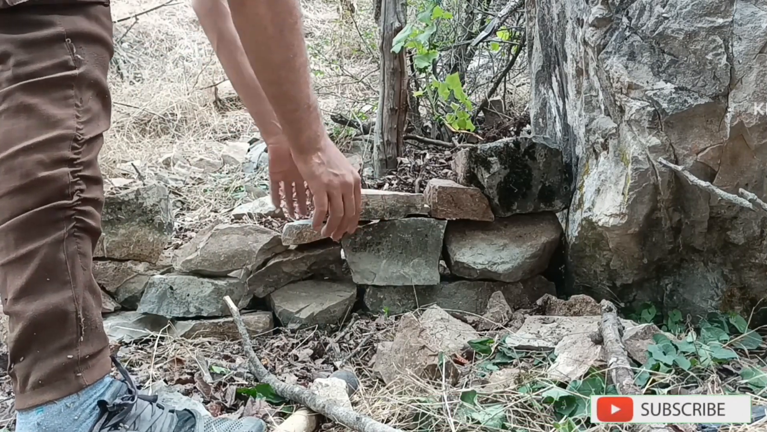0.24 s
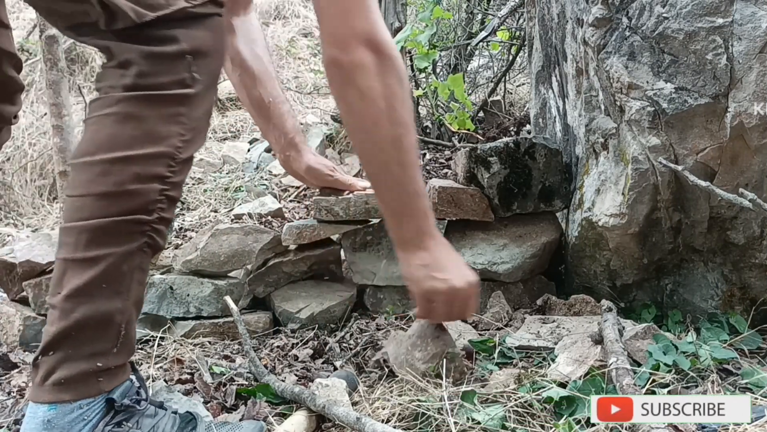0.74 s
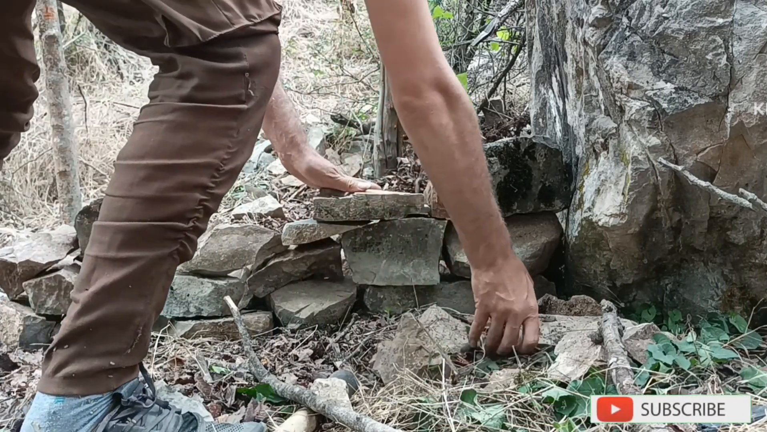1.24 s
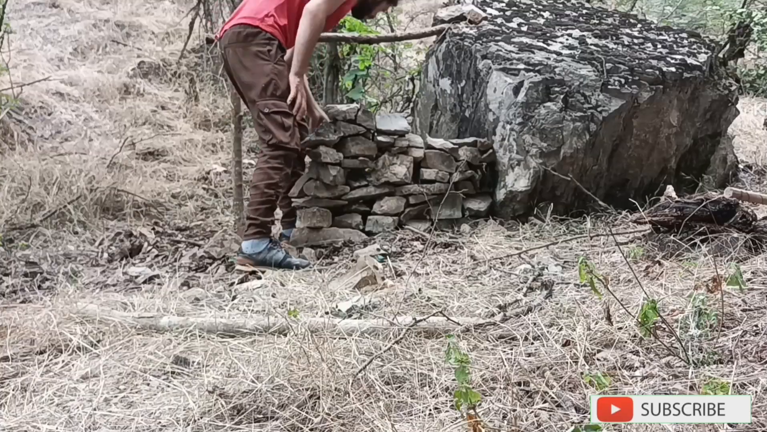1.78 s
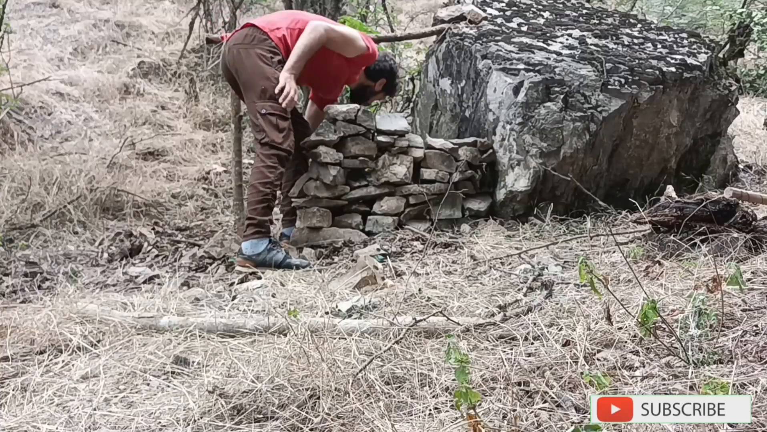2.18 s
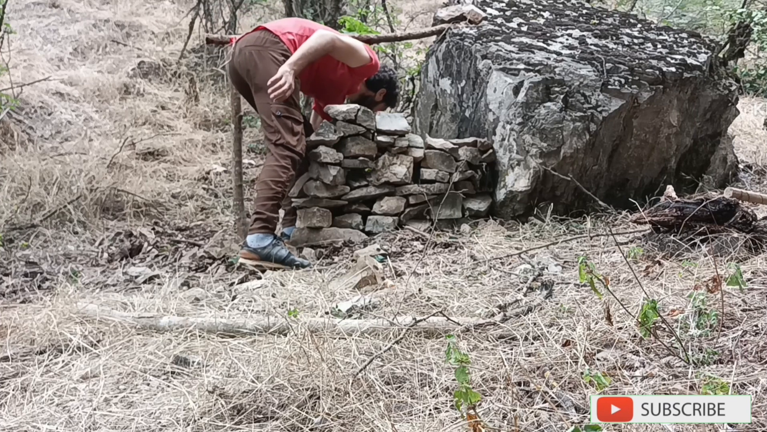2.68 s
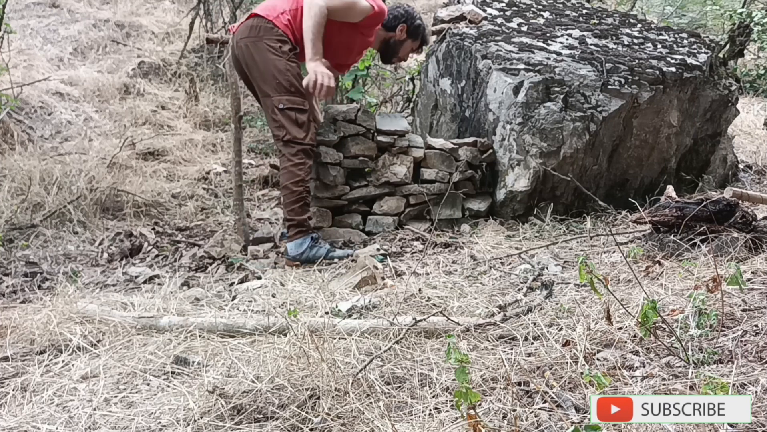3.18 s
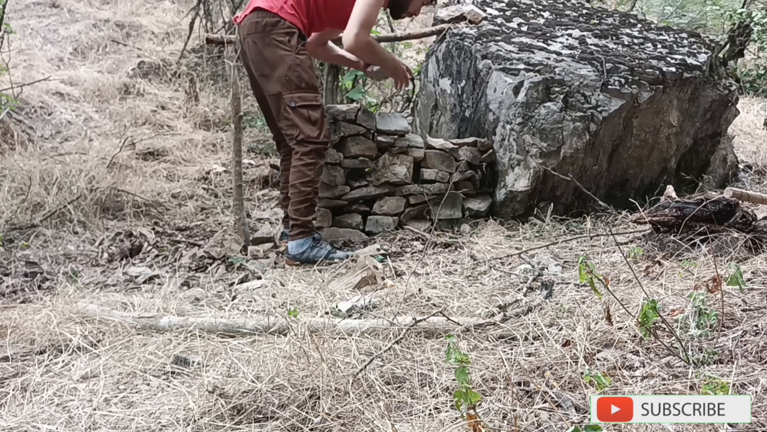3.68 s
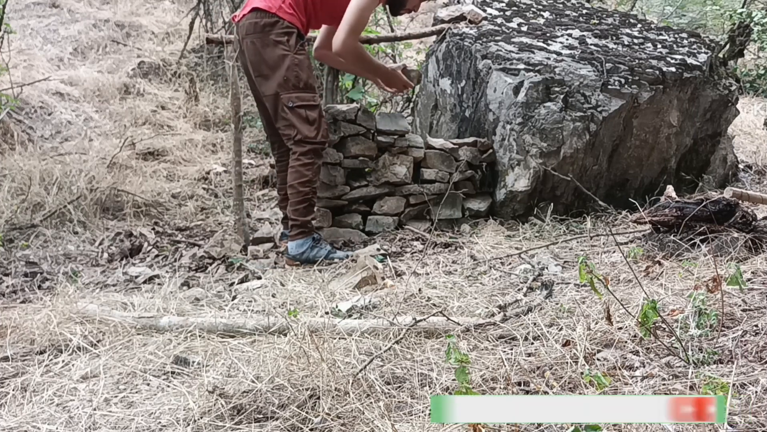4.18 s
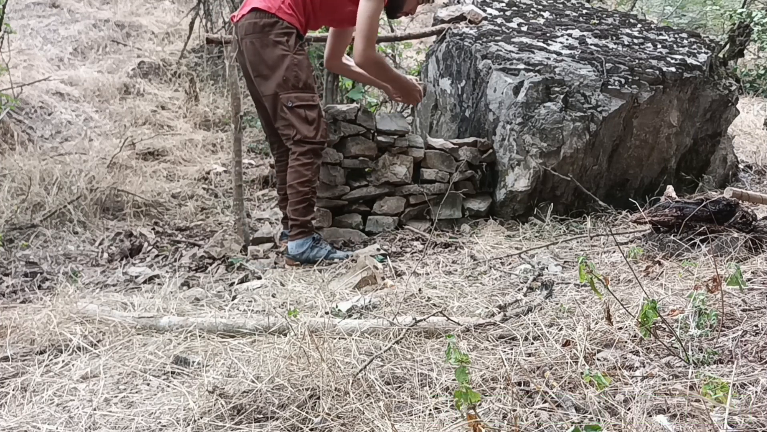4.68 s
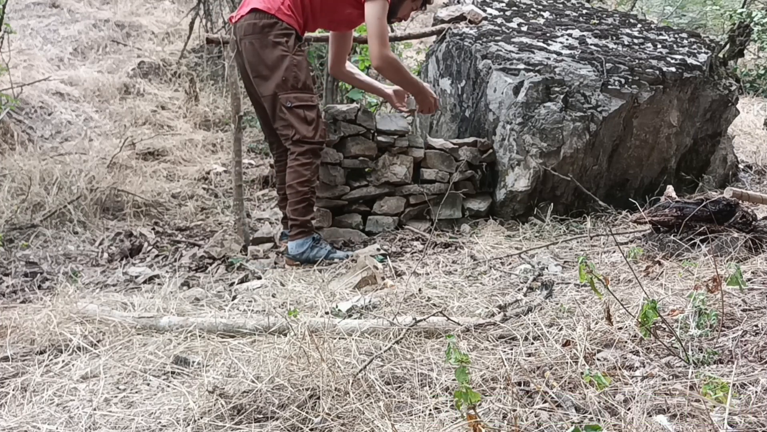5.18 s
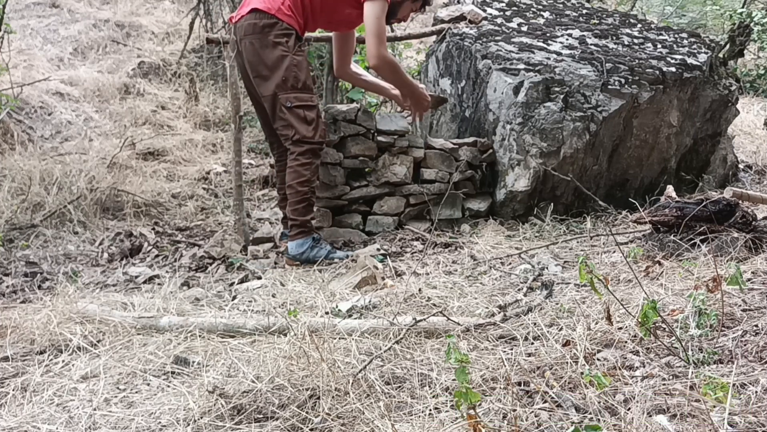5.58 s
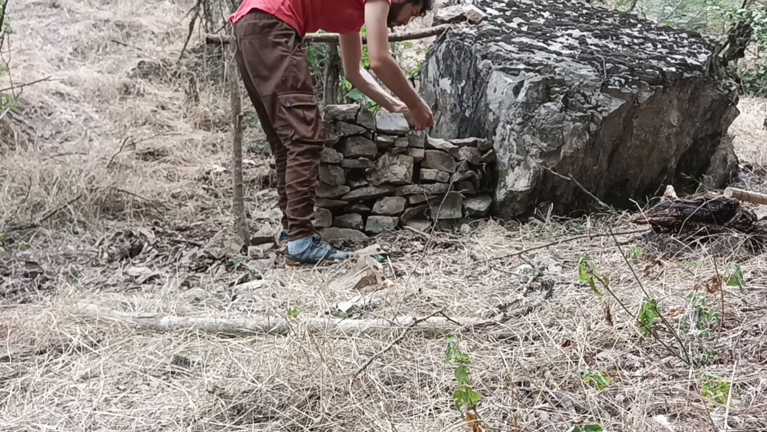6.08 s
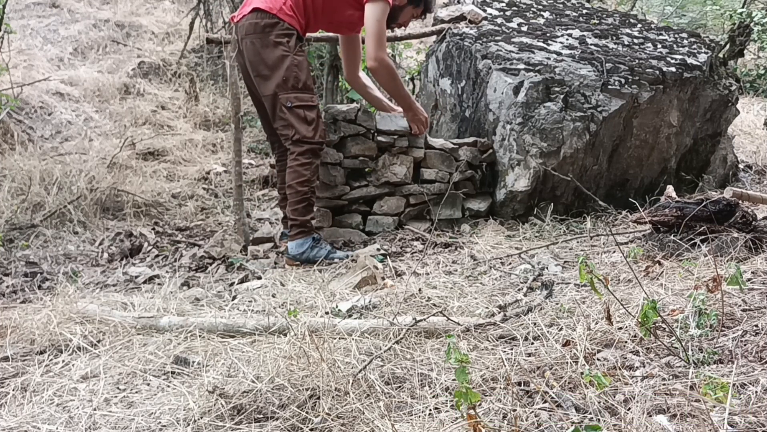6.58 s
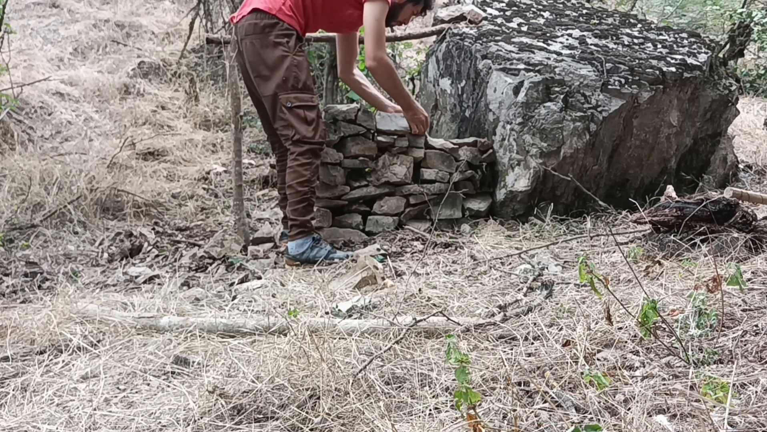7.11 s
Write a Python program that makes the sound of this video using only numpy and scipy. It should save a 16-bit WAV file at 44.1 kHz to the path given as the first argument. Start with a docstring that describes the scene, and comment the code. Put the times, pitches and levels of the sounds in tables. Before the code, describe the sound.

A faint, low outdoor rumble runs throughout. From 0 to 1.4 s, dry leaves and clothing rustle close by: a weak stone nudge near 0.4 s, small knocks with soft dull thuds at 0.64 and 0.91 s, then brushing and crisp twig snaps, strongest around 1.15 s. The close rustle stops dead at about 1.4 s. At 1.57 s a bright, hard stone clack strikes slightly left, with a low wall thud and quick shrinking rebounds. Light rustling continues. A softer, grittier blow falls at 2.7 s, followed by a run of little taps and soft thuds from 2.8 to 3.3 s. Quiet until a small twig tick at 4.3 s, then the loudest, sharpest clack at 4.53 s, with small gritty settling until 4.9 s. Trees return a short faint reflection. Afterwards only fading rustle, a tick at 5.2 s, a brush at 6.4 s and barely audible stone contact.

```python
"""A faint outdoor rumble and a rustle of dry leaves and clothing open the scene, with a few twig snaps.
Then flat stones are tapped, set down and knocked onto a dry wall in a forest.
Each hard blow is a sharp contact of damped modes, a low thud of the wall and three shrinking rebounds.
Bursts of gritty noise ring the stones as clacks; the ground and then the trees throw the sound back.
Shaped noise makes the leaves and the air; short ticks with a tail of noise make the snapping stalks."""
import sys
import numpy as np
from scipy import signal
from scipy.fft import rfft, irfft
from scipy.io import wavfile

SR = 44100
rng = np.random.default_rng(int(sys.argv[2]) if len(sys.argv) > 2 else 0)


def file_out(sig):
    """Save sig as 16-bit WAV at sys.argv[1]."""
    # one column per channel
    cols = np.atleast_2d(sig).T
    # limit, then scale
    lim = np.clip(cols, -1, 1)
    pcm = np.round(lim * 32767).astype(np.int16)
    wavfile.write(sys.argv[1], SR, pcm)


N = 324083
EVENT_T = np.arange(SR // 2) / SR  # time axis of one event, s

# Hard blows on the wall: start_s, level_db, pitch_hz, edge_lead_s (the edge touches this much earlier),
# edge_level_db, hollow_level_db, thud_level_db, boom_level_db
HARD_BLOWS = [(1.565, -25, 2350, .0095, -32.5, -47, -31, -35), (2.7, -34, 3130, 0.0053, -24, -43, -31, -38),
              (4.526, -14.5, 2270, .0057, -25.5, -33, -32.5, -59)]
# Hollow knock of the stones beneath: pitch_hz, level_db
HOLLOW_MODES = [(265, -0.5), (510, -1)]
# Stones nudged against a neighbour: start_s, level_db, pitch_hz
STONE_TAPS = [(.390, -40, 2450), (0.6414, -34, 1460), (.6425, -37, 640), (0.9104, -36, 1500),
              (.9115, -39.5, 680), (1.3196, -39.5, 1080), (1.920, -43.5, 795), (2.6445, -45.5, 1390),
              (2.809, -37, 890), (2.962, -40.5, 960), (3.0073, -34.5, 1520), (3.0493, -26, 1460),
              (3.084, -33.5, 1300), (3.1616, -35.5, 1950), (3.2676, -26.5, 3200), (4.66, -45, 1980),
              (6.479, -43, 960)]
# A stone's weight coming down softly: start_s, level_db, pitch_hz
SOFT_THUDS = [(0.6403, -41, 380), (0.6493, -37, 302), (.736, -48, 69.5), (.912, -31.5, 302),
              (.927, -42, 352), (1.031, -41, 327), (1.067, -42.5, 84.6), (3.045, -33, 121),
              (3.164, -38.5, 134), (6.73, -49, 170)]
# Clacks and scrapes as stones bed down: start_s, level_db, rise_s, t60_s, body_db (tone at 800 Hz),
# hardness_db (tone at 8 kHz), ring_hz (strongest ring)
GRITTY_CLACKS = [(.376, -47, .012, .22, 8, -22, 2400), (1.5635, -27.5, 0.0009, 0.11, 5.5, 11.5, 9620),
                 (1.5666, -22, 0.008, .21, 8, 16, 7830), (1.815, -50, .01, 0.27, 24, -10, 1830),
                 (2.696, -28.5, .012, 0.23, 3, 4, 3000), (2.736, -31.5, 0.011, 0.16, 0, -8, 1840),
                 (2.856, -45.5, 0.016, 0.24, -6, -13, 2370), (3.027, -40.5, 0.0064, 0.22, 11.5, -9, 3410),
                 (3.163, -38, 0.014, 0.17, 9, -7, 2096), (4.5231, -18, .014, .18, -6, 3.5, 9240),
                 (4.585, -41, 0.01, .29, -18.5, 6.5, 2180), (4.652, -39.5, .008, 0.16, -4, -6, 2200),
                 (4.84, -45, 0.016, 0.17, -1.5, -0.5, 2040)]
# Basic colour of a clack: freq_hz, gain_db
CLACK_TONE = [(70, -34), (200, -29), (520, -16), (700, -17), (1000, -11.5), (1500, -4), (2900, 0),
              (4400, -5), (5800, -17), (7000, -17), (8200, -13.5), (9500, -12), (11000, -21.5),
              (13800, -31.5), (15000, -62)]
# Resonances of the flat stone: freq_hz, width_hz, level_db
STONE_RINGS = [(1468, 110, -3), (1643, 57, -0.5), (1809, 42, 3.5), (1980, 18, 3.5), (2093, 46, 2),
               (2500, 31, -0.5), (2680, 38, -14), (2900, 45, -16), (3883, 16.5, 3.5), (4270, 24, 1.5),
               (4270, 31, -9), (8340, 50, 6), (9000, 110, 4.5), (13300, 250, 11.5)]
# The loudest dry twigs and stalks: start_s, level_db, pitch_hz
TWIG_SNAPS = [(.23, -46, 9000), (0.368, -47, 6900), (.741, -36.5, 5700), (.774, -36, 8100),
              (.802, -35.5, 8000), (0.945, -38, 4000), (1.109, -35, 4180), (1.1333, -31, 6100),
              (1.1428, -31, 4420), (1.15, -27.5, 6660), (1.233, -35, 7400), (2.519, -46.5, 10200),
              (4.3012, -36, 7440), (5.183, -38, 7550), (6.971, -45, 8000)]
# Short brushes over leaves and stone: start_s, level_db, rise_s, t60_s
BRUSHES = [(.745, -39, 0.024, 0.15), (1.015, -40, 0.0095, 0.088), (1.128, -28.5, 0.019, 0.13),
           (1.214, -35, 0.016, 0.114), (3.03, -40.5, 0.018, 0.23), (3.175, -44, 0.016, 0.28),
           (6.379, -36.5, 0.025, 0.29)]
# Colour of a brush: freq_hz, gain_db
BRUSH_TONE = [(300, 0), (1200, -4.5), (3200, 1.5), (5200, -2), (8000, -0.5), (10500, 1), (15000, -13.5)]
# Movements that stir leaves and clothing: start_s, length_s, level_db,
# easing_db_per_s (a negative value makes the movement grow)
MOVEMENTS = [(0.095, .3, -72.5, 2.5), (0.679, 0.67, -60, -11), (1.401, .2, -67, 1.5),
             (1.64, 0.57, -56.5, 7), (2.658, 1.02, -55, 7.5), (4.601, .87, -55, 5.5), (5.5, .35, -68, 9),
             (6.426, .3, -66, 18), (6.737, 0.17, -67, -31)]
# Colour of the leaf rustle: freq_hz, gain_db
LEAF_TONE = [(100, 3.5), (300, 0.5), (800, -6), (1500, -5), (3500, -5), (5000, -9), (6500, -8.5),
             (8000, -6.5), (11000, -6), (15000, -20.5)]
# Colour of the outdoor air: freq_hz, gain_db
AIR_TONE = [(25, 5), (50, -7.5), (90, 0), (172, -2.5), (250, -6.5), (450, -10.5), (730, -14), (1600, -20.5),
            (2400, -21.5), (5500, -35), (15000, -44.5)]
# Stereo spread of diffuse sound: freq_hz, side_minus_mid_db
STEREO_SPREAD = [(30, -9), (70, -2), (250, -1.5), (600, -0.5), (1200, -0.5), (10000, 0)]
# Treble balance of the right port: freq_hz, gain_db
RIGHT_PORT_TONE = [(1000, -1.5), (4000, -0.5), (6000, -1), (7600, 3.5), (9300, -3.5), (10400, -9),
                   (15000, -9)]
# Main mode of a damped body and its weaker neighbours: freq_ratio, level_db
KNOCK_MODES = [(.63, -10.5), (1, 0), (1.38, -21), (1.8, -32)]
# Colour of the early scatter and of the trees' answer: freq_hz, gain_db
NEAR_TONE = [(100, 0.97), (1000, 0), (10000, 0.6)]
TREE_TONE = [(150, 0), (800, 1.5), (1800, 1.5), (4000, -3.5), (8000, -9.5), (14000, -20.5)]

TAP_CYCLES, BLOW_CYCLES, TOUCH_CYCLES = 12.5, 12.7, 67  # set how long a contact rings, in cycles
WALL_LEAD_MS, TAP_LEAD_MS = .51, 0.075  # left ear leads; taps are nearly straight ahead
TOUCH_THUD_DB, TOUCH_THUD_HZ = -3, 422  # the edge touch gives a lighter hollow knock
WALL_THUD_HZ = 197  # the wall's main note
BOOM_HZ, BOOM_DELAY_S, BOOM_T60_S = 100, 0.011, .11  # the whole wall gets going a little later
REBOUND_S, REBOUND_SHRINK = .039, .4  # first gap, and the share of it left each time
REBOUND_DB, REBOUND_HZ, REBOUND_LOSS_DB = -25, 2150, 6.5  # first level, pitch, loss per rebound
THUD_T60_S, THUD_T60_SLOPE = .046, 0.44  # decay at 300 Hz; deeper thuds last longer
WALL_DAMPING = 0.69  # share of that decay left when a stone is pressed on hard
THUD_LOW_CUT = 0.51  # share of a thud's pitch below which little moves
CLACK_RING_DB = -11.5  # strongest ring against the clack's body
EDGE_SHARE, EDGE_DB = .58, -.5  # hardness lifts 4.5 kHz by this share, from this level
FIZZ_SHARE, FIZZ_DB = 1.25, -2.5  # and 13 kHz likewise
STALK_COUNT, STALK_HZ = 45, 7760  # fainter stalks that give way at random
STALK_OVER_STIR_DB, STALK_SCATTER_DB = 7.5, 5
FIBRE_DB = -7  # the tearing, against the tick
MOVE_ATTACK_S, MOVE_RELEASE_T60_S = 0.079, .52
CLOSE_UNTIL_S = 1.385  # the early, close rustle stops dead here
CLOSE_STILL_DB, STILL_DB = -72, -78  # resting rustle before and after that moment
AIR_DB = -59.5
TOP_HZ = 15100  # treble limit


def blows():
    """An edge touches, the face lands and shakes the wall, then the stone rocks to rest."""
    out = np.zeros((2, N))
    for s, db, hz, early, touch_db, hollow_db, thud_db, boom_db in HARD_BLOWS:
        # edge touch, pitched a little lower than the landing
        touch_thud = thud(TOUCH_THUD_HZ, WALL_DAMPING * thud_t60(TOUCH_THUD_HZ))
        add(out, s - early, undb(touch_db) * contact(.85 * hz, TOUCH_CYCLES, WALL_LEAD_MS))
        add(out, s - early, undb(hollow_db + TOUCH_THUD_DB) * touch_thud)
        # landing of the face
        add(out, s, undb(db) * contact(hz, BLOW_CYCLES, WALL_LEAD_MS))
        for mode_hz, mode_db in HOLLOW_MODES:
            hollow = thud(mode_hz, WALL_DAMPING * thud_t60(mode_hz))
            add(out, s, undb(hollow_db + mode_db) * hollow)
        wall_thud = thud(WALL_THUD_HZ, WALL_DAMPING * thud_t60(WALL_THUD_HZ))
        add(out, s, undb(thud_db) * wall_thud)
        add(out, s + BOOM_DELAY_S, undb(boom_db) * thud(BOOM_HZ, BOOM_T60_S))
        # each rebound comes sooner and weaker
        for k in range(3):
            s += REBOUND_S * REBOUND_SHRINK ** k
            rebound = contact(REBOUND_HZ, BLOW_CYCLES, WALL_LEAD_MS)
            add(out, s, undb(REBOUND_DB - k * REBOUND_LOSS_DB) * rebound)
    return out


def taps():
    """Light knocks as stones are shifted into place."""
    out = np.zeros((2, N))
    for s, db, hz in STONE_TAPS:
        add(out, s, undb(db) * contact(hz, TAP_CYCLES, TAP_LEAD_MS))
    return out


def contact(hz, cycles, lead_ms):
    """A hard, short knock of stone on stone; from the left it reaches that ear first."""
    t60 = cycles / hz
    # rough faces touch at many points, which blurs the note into a dry crack
    crack = unit(resonate(rng.standard_normal(len(EVENT_T)), hz, width=0.6 * hz))
    crack = undb(-8.0) * crack * swell(rise=0.00053, t60=2.5 * t60)
    sound = crack - knock(hz, 0.461 * t60)
    # a blunt contact lasts a moment, so little sounds above the modes
    blunt = signal.butter(3, min(2.0 * hz, SR / 3), fs=SR, output="sos")
    left = signal.sosfilt(blunt, sound)
    right = np.roll(left, int(lead_ms * SR / 1000))
    return np.array([left, right])


def knock(hz, t60):
    """A heavily damped body: a main mode among weaker ones, the higher dying sooner."""
    ring = np.zeros(len(EVENT_T))
    for ratio, db in KNOCK_MODES:
        tone = np.sin(2 * np.pi * min(hz * ratio, SR / 2) * EVENT_T)
        ring += undb(db) * tone * fade(EVENT_T, t60 / np.sqrt(ratio))
    push = 1 - np.exp(-(EVENT_T * hz / 0.19) ** 2)  # the force builds over part of a cycle
    return ring * push


def thuds():
    """Stones set down gently: mostly the low note of the wall."""
    out = np.zeros((2, N))
    for s, db, hz in SOFT_THUDS:
        add(out, s, undb(db) * thud(hz, thud_t60(hz)))
    return out


def thud(hz, t60):
    """The stacked wall answers low and briefly, and its loose stones jostle above that note."""
    tone = [(0.57 * hz, -22), (hz, 0), (3.08 * hz, -4), (5 * hz, -14), (12 * hz, -42), (30 * hz, -70)]
    jostle = unit(colour(diffuse(len(EVENT_T)), tone))
    jostle = undb(-11.5) * jostle * swell(rise=0.00098, t60=1.12 * t60)
    stiff = signal.butter(3, THUD_LOW_CUT * hz, "high", fs=SR, output="sos")
    return signal.sosfilt(stiff, knock(hz, t60) + jostle)


def thud_t60(hz):
    """Decay time of a thud, longer for a deeper pitch."""
    return THUD_T60_S * (300 / hz) ** THUD_T60_SLOPE


def clacks():
    """A dense burst of tiny impacts rings the stone; the place of the blow favours one mode."""
    out = np.zeros((2, N))
    for s, db, rise, t60, body_db, hard_db, ring_hz in GRITTY_CLACKS:
        # part arrives straight from the wall on the left, the rest scattered by the ground
        straight = diffuse(len(EVENT_T), grain_db=2.5)[0]
        late = np.roll(straight, int(WALL_LEAD_MS * SR / 1000))
        scattered = diffuse(len(EVENT_T), grain_db=-1.46)
        grit = scattered + undb(-1.5) * np.array([straight, late])
        body = grit.copy()
        for hz, width, mode_db in STONE_RINGS:
            body += undb(mode_db) * resonate(grit, hz, width)
        edge_db = EDGE_SHARE * hard_db + EDGE_DB
        fizz_db = FIZZ_SHARE * hard_db + FIZZ_DB
        hardness = [(800, body_db), (2000, 0.024), (4500, edge_db), (8000, hard_db), (13000, fizz_db)]
        body = unit(colour(colour(body, CLACK_TONE), hardness))
        ring = undb(CLACK_RING_DB) * unit(resonate(grit, ring_hz, width=90))
        add(out, s, undb(db) * (body + ring) * swell(rise, t60))
    return out


def echo(x, t60, points, delay):
    """Many small reflections that build up, then fade."""
    t = np.arange(SR) / SR
    build_up = 1 - np.exp(-(t / delay) ** 2)
    response = colour(diffuse(SR, grain_db=3), points) * fade(t, t60) * build_up
    return signal.fftconvolve(x, unit(response) / np.sqrt(SR), axes=-1)[:, :N]


def snaps(stir):
    """A breaking stalk gives one sharp tick, then a few milliseconds of tearing fibres."""
    out = np.zeros((2, N))
    # stalks give way more often, and louder, the stronger the movement
    chance = np.cumsum(stir) / np.sum(stir)
    places = np.searchsorted(chance, rng.random(STALK_COUNT))
    scatter_db = STALK_SCATTER_DB * rng.standard_normal(STALK_COUNT)
    levels_db = 20 * np.log10(stir[places]) + STALK_OVER_STIR_DB + scatter_db
    stalks = [(i / SR, db, STALK_HZ) for i, db in zip(places, levels_db)]
    size = 2048
    tearing = swell(rise=0.001, t60=0.016)[:size]
    for s, db, hz in TWIG_SNAPS + stalks:
        tick = knock(hz, t60=0.00075)[:size]
        fibres = unit(resonate(diffuse(size), hz, width=4500)) * tearing
        add(out, s, undb(db) * (tick + undb(FIBRE_DB) * fibres))
    return out


def stirring():
    """Strength of the movement: each one builds up, eases off or grows, and dies away."""
    t = np.arange(N) / SR
    close = t < CLOSE_UNTIL_S
    power = undb(np.where(close, CLOSE_STILL_DB, STILL_DB)) ** 2
    for s, length, db, easing_db in MOVEMENTS:
        attack = np.clip((t - s) / MOVE_ATTACK_S, 0, 1)
        hold = undb(db - easing_db * np.clip(t - s, 0, length))
        release = fade(np.maximum(t - s - length, 0), MOVE_RELEASE_T60_S)
        same_side = close == (s < CLOSE_UNTIL_S)  # no movement carries across the stop
        power = power + (attack * hold * release * same_side) ** 2
    return np.sqrt(power)


def rustle(stir):
    """Fine hiss and sparse crackle that follow the movement, with a few quick brushes."""
    leaves = diffuse(N, grain_db=1.44) + undb(-10) * diffuse(N, grain_db=3.0)
    out = unit(colour(leaves, LEAF_TONE)) * stir * undb(1.1 * walk(rate=20))
    for s, db, rise, t60 in BRUSHES:
        brush = unit(colour(diffuse(len(EVENT_T), grain_db=1.1), BRUSH_TONE))
        add(out, s, undb(db) * brush * swell(rise, t60))
    return out


def air():
    """Faint, slightly wavering outdoor rumble made of coloured noise."""
    return unit(colour(diffuse(N), AIR_TONE)) * undb(AIR_DB + 1.3 * walk(rate=6.4))


def diffuse(size, grain_db=0):
    """Stereo noise from all around, more alike in the bass; uneven grain sizes make it crackle."""
    grains = np.minimum(rng.exponential(size=size // 20 + 1), 2 * np.pi)
    sizes = np.repeat(undb(grain_db * grains), 20)[:size]
    mid, side = rng.standard_normal((2, size)) * sizes
    side = colour(side, STEREO_SPREAD)
    return unit(np.array([mid + side, mid - side]))


def walk(rate):
    """Slow random drift with a spread near 1, through `rate` random points per second."""
    steps = rng.standard_normal(N // 100)
    return np.interp(np.arange(N) / SR * rate, np.arange(len(steps)), steps)


def swell(rise, t60):
    """Envelope of a burst that builds up and dies away."""
    return (1 - np.exp(-(EVENT_T / rise) ** 2)) * fade(EVENT_T, t60)


def fade(t, t60):
    """Exponential decay, 60 dB in t60."""
    return np.exp(-np.log(1000) * t / max(t60, 1e-4))


def colour(x, points):
    """Filter by (freq_hz, gain_db) points joined on a log-frequency axis."""
    hz, db = np.transpose(points)
    gain = undb(np.interp(np.log(freqs(x)), np.log(hz), db))
    return irfft(rfft(x) * gain, x.shape[-1])


def resonate(x, hz, width):
    """One resonance, gain 1 at its centre."""
    f = freqs(x)
    detuning = hz / width * (f / hz - hz / f)
    return irfft(rfft(x) / (1 + 1j * detuning), x.shape[-1])


def freqs(x):
    """Frequency of each bin of a signal, at least 1 Hz."""
    return np.maximum(np.fft.rfftfreq(x.shape[-1], 1 / SR), 1)


def undb(db):
    """Decibels to gain."""
    return 10 ** (np.asarray(db) / 20)


def unit(x):
    """Scale to an rms of 1."""
    return x / np.sqrt(np.mean(x ** 2))


def add(out, s, sound):
    """Mix a sound in at time s."""
    start = max(int(s * SR), 0)
    part = sound[..., :N - start]
    out[..., start:start + part.shape[-1]] += part


def scene():
    """Ground and boulder scatter the knocks at once; the trees answer later, mostly in the mids."""
    knocks = blows() + taps() + thuds()
    near = undb(-8) * echo(knocks, t60=.09, points=NEAR_TONE, delay=0.0013)
    stones = knocks + near + clacks()
    trees = undb(-21.5) * echo(stones, t60=0.47, points=TREE_TONE, delay=.04)
    stir = stirring()
    return stones + trees + snaps(stir) + rustle(stir) + air()


def record(dry):
    """The microphones shed the deepest bass, the right port is duller on top, the top treble is cut."""
    bass_cut = signal.butter(4, 55, "high", fs=SR, output="sos")
    sound = signal.sosfilt(bass_cut, dry)
    ports = np.array([sound[0], colour(sound[1], RIGHT_PORT_TONE)])
    treble_cut = signal.ellip(10, .2, 80, TOP_HZ, fs=SR, output="sos")
    return signal.sosfilt(treble_cut, ports)


dry = scene()
out = record(dry)
file_out(out)
```